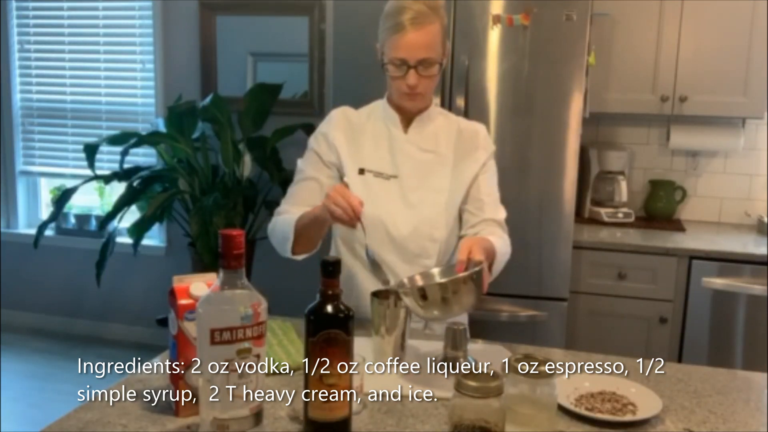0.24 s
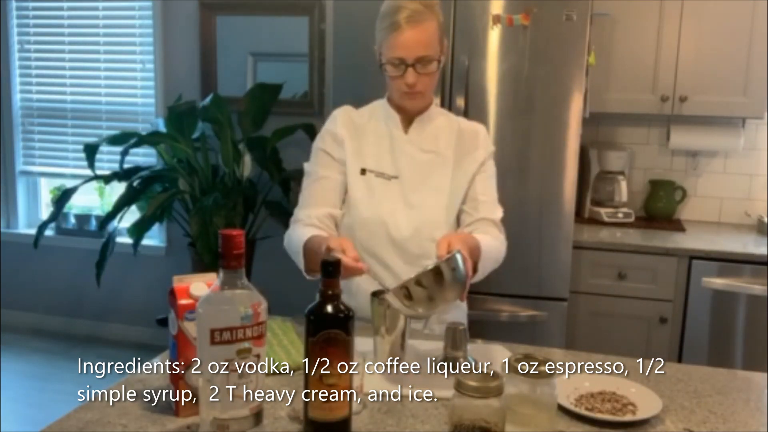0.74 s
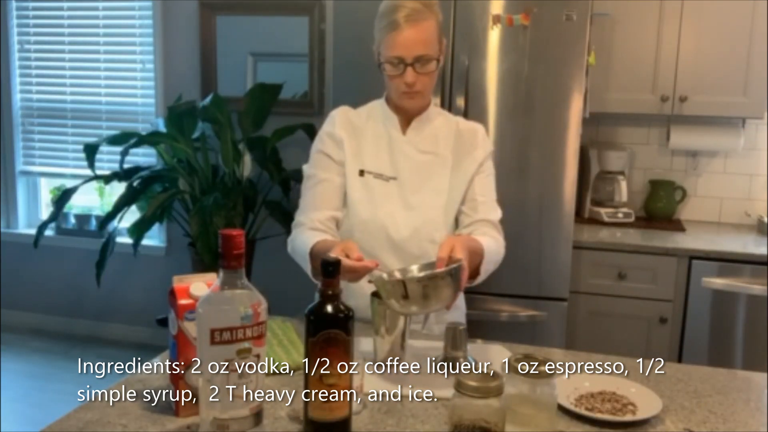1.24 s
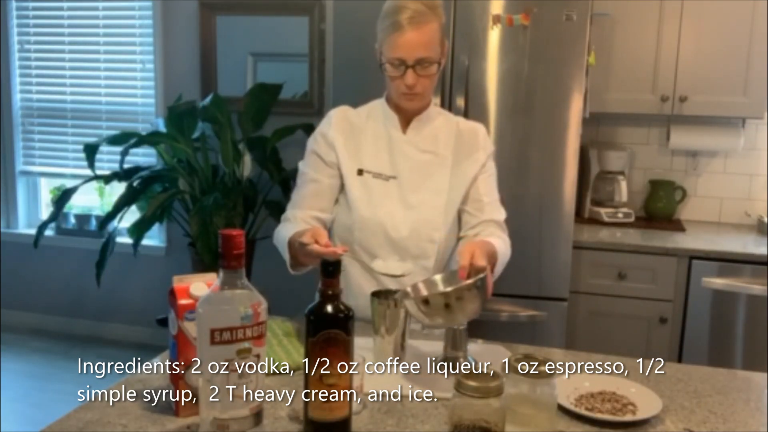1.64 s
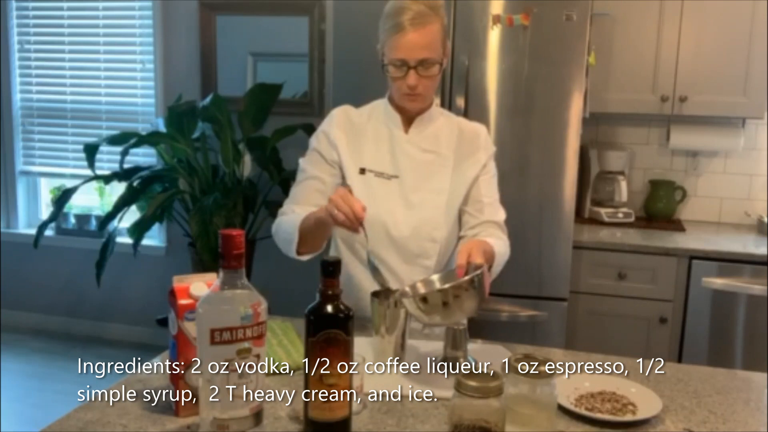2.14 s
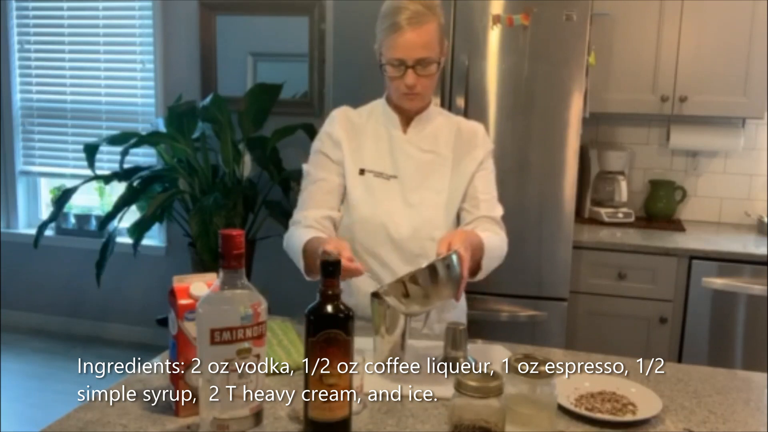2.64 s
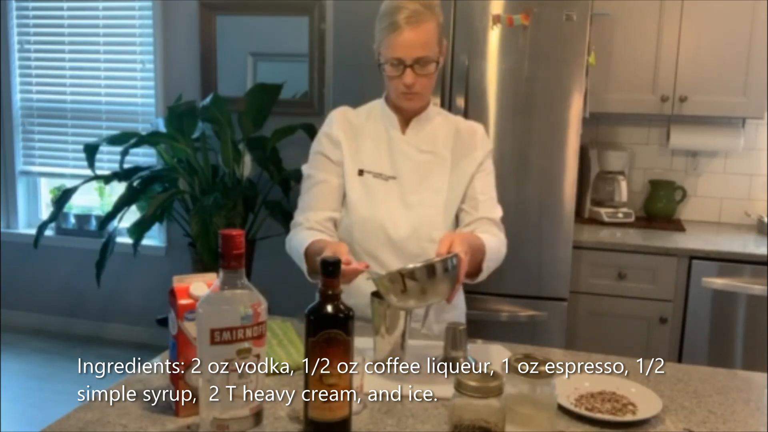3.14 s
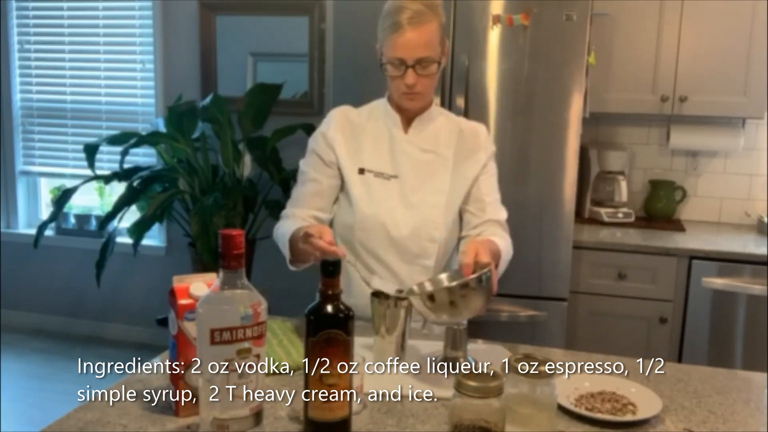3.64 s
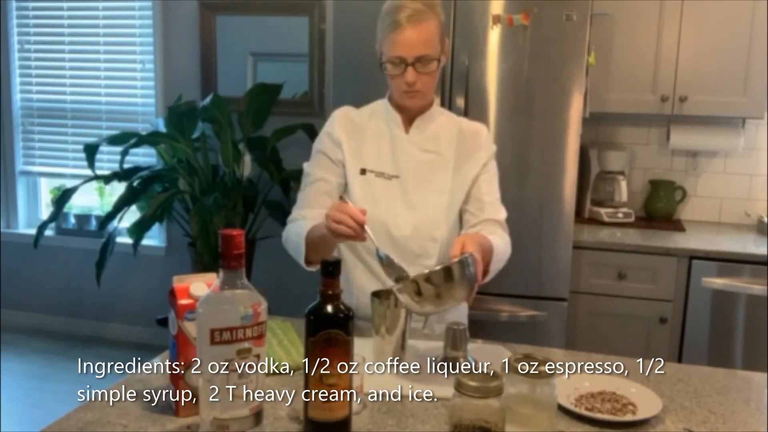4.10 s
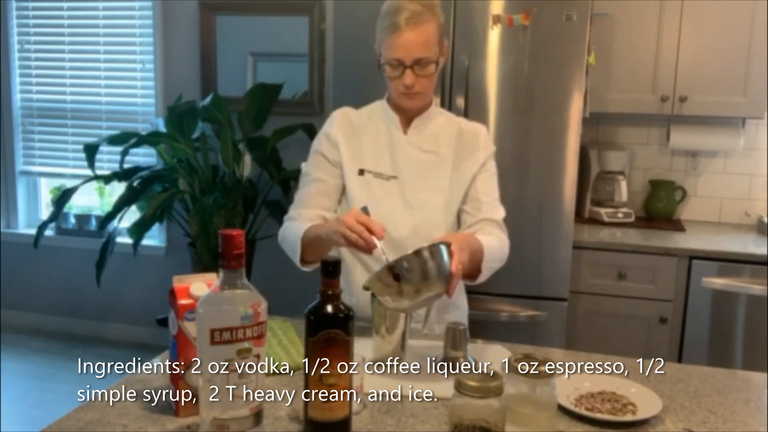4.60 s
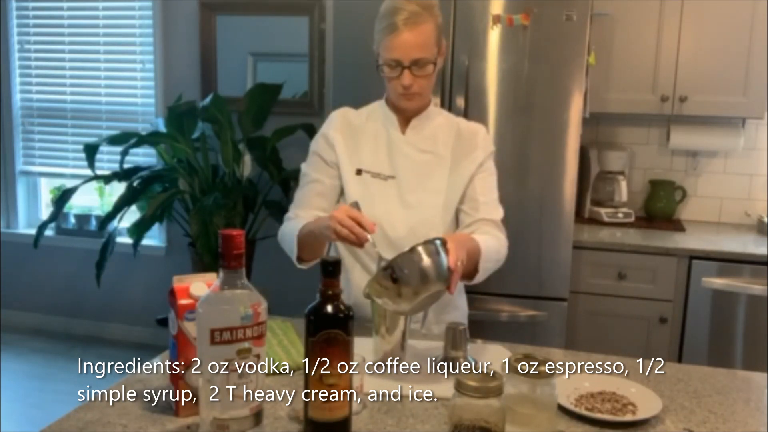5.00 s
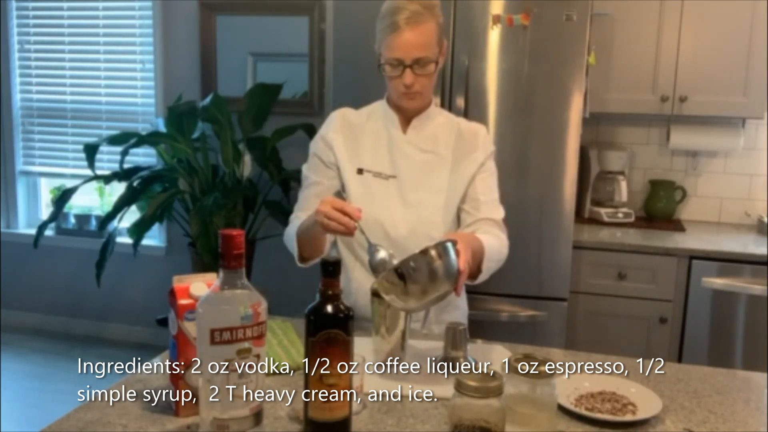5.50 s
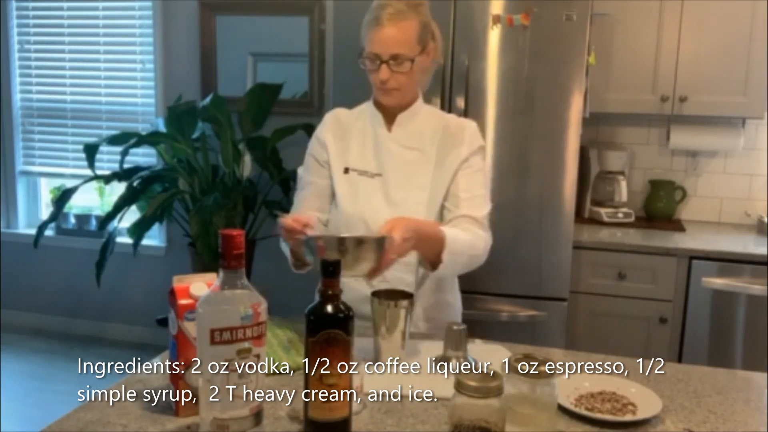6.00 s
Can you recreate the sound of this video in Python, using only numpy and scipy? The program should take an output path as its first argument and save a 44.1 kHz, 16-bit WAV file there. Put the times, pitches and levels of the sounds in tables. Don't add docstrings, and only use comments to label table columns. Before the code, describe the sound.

A refrigerator hums low and steadily in a bright, reflective kitchen, picked up in stereo from some metres away. At once a spoon raps a steel rim in rapid taps, with ice sliding and clinking until 0.2 s. A click at 0.5 leads into a dense rattling tumble of cubes in a steel bowl, strongest from 0.75 to 1.2, thinning by 1.45. Around 1.9 to 2.1 cubes drop into the metal tin with crisp, short rings. A sharp clink at 2.4 starts more scraping and clacking to 2.9. A hard snap at 3.0 begins a looser run of knocks until 3.3. After a lull, bright ticks come at 3.8 to 3.9, then a softer shuffle at 4.3 to 4.6. Sparse small clicks and faint scrapes continue from 5.0 to 5.6. At 6.0 to 6.2 the bowl is set down with hollow, ringing clanks and rattling ice.

```python
import sys
import numpy as np
from scipy import signal
from scipy.fft import rfft, irfft, next_fast_len
from scipy.io import wavfile
from scipy.ndimage import uniform_filter1d

SR = 44100
rng = np.random.default_rng(int(sys.argv[2]) if len(sys.argv) > 2 else 0)


def master_out(mix):
    frames = np.transpose(np.atleast_2d(mix))
    ceiling = np.clip(frames, -1, 1)
    pcm = np.round(ceiling * 32767).astype(np.int16)
    wavfile.write(sys.argv[1], SR, pcm)


def nominal_scale(level):
    x = np.asarray(level, float) / 20
    return 10 ** x


N = 275668

# pitch_hz, density_db_per_hz
DRONE = [(15, -55), (25, -23), (43, 2.5), (84, 2), (104, -0.5), (174, -4.5), (256, -1), (331, -11.5),
         (358, -23), (407, -4), (451, -30), (1060, -16), (1410, -32), (1520, -42), (12000, -55),
         (15600, -96), (22000, -120)]
# pitch_hz, width_hz, level_db
HUM = (115.8, 14.6, -58)
# pitch_hz, correlation
LIKENESS = [(100, 0.77), (500, 0.62), (1500, 0.11), (4000, 0.071), (6500, 0.087), (8500, 0.4), (12000, 0.7)]
# start_s, blow_db
RIM_HITS = [
    (.001, -33),
    (.048, -36),
    (.055, -33),
    (.062, -34),
    (.095, -42.5),
    (.165, -48),
]
# pitch_hz, level_db, t60_s
RIM_MODES = [(2770, -5.5, 0.075), (2800, -12, 0.1), (4440, -28, 0.068), (4350, -2, 0.09),
             (4450, -35, 0.083), (5663, -12, 0.056), (6464, -11.5, 0.1), (6656, -6.5, 0.061),
             (7480, -10.5, 0.078), (8600, -11.5, 0.069)]
# start_s, blow_db
TIN_HITS = [
    (1.913, -37.5),
    (1.963, -30),
    (1.972, -29),
    (1.99, -38),
    (2.012, -36.5),
    (2.07, -38),
    (2.085, -44),
]
# pitch_hz, level_db, t60_s
TIN_MODES = [(767, -9.5, 0.07), (2410, -23, 0.11), (2469, -4.5, 0.093), (2625, -17, 0.068),
             (4290, -11, 0.06), (4300, -14, 0.087), (6210, -8, 0.037)]
# start_s, blow_db
BOWL_HITS = [(.086, -35), (.1, -47), (.165, -52), (.195, -65), (3.251, -51), (3.291, -70), (4.384, -51),
             (4.461, -55), (6.04, -36.5), (6.058, -47), (6.09, -49), (6.134, -43.5), (6.164, -34),
             (6.178, -38), (6.2, -50)]
# pitch_hz, level_db, t60_s
BOWL_MODES = [(526, -20, 0.13), (616, -22, 0.23), (728.3, -4.5, 0.28), (809, -6, 0.25), (864, -8.5, 0.43),
              (909, -4.5, 0.28), (972, -10, 0.22), (1344, -6.5, 0.18), (1410, -17, 0.062),
              (1543, -7, 0.029), (1689, -10, 0.14), (1784, -10, 0.068), (2086, -7, 0.056),
              (2595, -6, 0.057), (3288, -6, 0.057), (4020, -15, 0.07), (7850, -29, 0.085)]
# start_s, level_db, pitch_hz, t60_s
RINGS = [(.001, -35, 4350, .2), (.03, -33, 4350, .12), (.056, -31, 4345, .08), (.05, -31, 2778, .12),
         (.1, -31, 2500, .04), (.105, -31, 1300, .04), (.194, -33, 760, .06), (1.962, -33, 4305, .12),
         (1.99, -33, 2450, .06), (2.02, -32, 2385, .07), (2.045, -38, 4240, .1), (2.401, -38, 3300, .12),
         (2.401, -38, 1250, .08), (3.014, -40, 2580, .08), (3.013, -37, 1170, .02),
         (3.038, -38, 1700, .012), (3.052, -46, 2550, .05), (3.03, -51, 3900, .15), (3.165, -44, 921, .15),
         (3.171, -44, 1670, .1), (3.215, -41, 550, .04), (3.237, -42, 1700, .012), (3.27, -39, 800, .04),
         (3.365, -40, 800, .06), (3.467, -46, 929, .03), (3.251, -37, 1650, .02), (3.253, -37, 915, .04),
         (3.29, -35, 1660, .025), (3.312, -35, 762, .03), (3.337, -38, 786, .08), (3.33, -41, 1660, .015),
         (3.443, -45, 875, .03), (3.8093, -40, 4510, .015), (3.858, -36, 2190, .06),
         (3.868, -35, 2440, .07), (3.868, -38, 3940, .03), (3.9245, -37, 2170, .04), (3.92, -38, 2750, .05),
         (3.925, -39, 3800, .04), (3.96, -41, 4000, .04), (6.025, -23, 910, .12), (6.037, -26, 900, .08),
         (6.057, -22, 880, .025), (6.056, -41, 4037, .05), (6.089, -34, 902, .2), (6.144, -32, 888, .03),
         (6.165, -32, 1360, .08), (6.222, -36, 3270, .06)]
# start_s, level_db, pitch_hz, t60_s
EARLY_CLACKS = [(.642, -36, 1730, .012), (.645, -36, 500, .03), (.757, -35, 738, .03),
                (.762, -43, 4300, .03), (.812, -31, 912, .02), (.83, -36, 1000, .015),
                (.845, -32, 1650, .02), (.899, -31, 1850, .015), (.928, -29, 1590, 0.016),
                (.955, -35, 1600, .04), (.987, -25.5, 1440, 0.014), (.995, -30, 1300, .012),
                (1.005, -34.5, 2800, .05), (1.034, -28, 1530, .03), (1.045, -31, 1560, .012),
                (1.034, -40, 3900, .05), (1.069, -30, 1400, .015), (1.075, -32, 2500, .02),
                (1.087, -29, 780, .02), (1.155, -31.5, 727, .025), (1.178, -33, 900, 0.044),
                (1.219, -37, 716, 0.034), (1.251, -38, 896, .03), (1.913, -40, 2465, 0.11),
                (1.965, -31, 2465, 0.13), (2.012, -33, 4235, .1), (2.075, -38, 2400, .1),
                (2.078, -36, 2750, .05), (2.225, -37, 975, 0.11), (2.415, -37.5, 2600, 0.092),
                (2.445, -38, 2600, .08), (2.475, -34, 1800, 0.009), (2.487, -34, 915, 0.036),
                (2.527, -34, 907, 0.071), (2.567, -37, 3450, .07), (2.585, -38, 2600, .03),
                (2.608, -33, 756, 0.027), (2.67, -40, 1750, .04), (2.675, -36, 856, .03),
                (2.705, -37, 700, .02), (2.728, -37.5, 918, 0.037), (2.818, -37, 1800, 0.016)]
# start_s, level_db, pitch_hz, t60_s
LATE_CLACKS = [(2.49, -38, 420, .05), (2.53, -39, 500, .05), (2.58, -40, 350, .06), (6.15, -36, 250, .12),
               (6.2, -39, 260, .1), (.66, -42, 330, .08), (.76, -41, 300, .08), (4.292, -36, 697, 0.034),
               (4.302, -48, 1840, 0.044), (4.362, -41, 1700, .012), (4.39, -36, 818, .02),
               (4.411, -35.5, 915, .025), (4.411, -39, 1690, .02), (4.422, -39, 1650, .015),
               (4.462, -33, 746, .03), (4.484, -38, 760, .03), (4.497, -38, 800, .015),
               (4.48, -43, 3400, .03), (4.531, -39, 764, .03), (4.531, -42, 3200, .02),
               (4.553, -40, 3400, .015), (4.555, -41, 4000, .015), (4.588, -41, 1700, .03),
               (4.596, -43, 3450, .04), (4.625, -48, 2000, .012), (4.659, -41, 805, .03),
               (4.685, -43, 802, 0.032), (5.051, -41, 1100, .02), (5.0754, -41, 1100, .04),
               (5.1248, -45, 1520, .05), (5.125, -39, 8000, 0.011), (5.186, -39, 7800, .006),
               (5.1862, -40, 3000, .004), (5.2241, -40, 796, .04), (5.259, -42, 2840, .02),
               (5.297, -43, 2800, .015), (5.4077, -45, 7000, .004), (5.416, -45, 8000, .004),
               (5.4, -49, 800, .08), (5.471, -47, 2580, 0.088), (5.538, -46, 2530, .04),
               (5.5585, -39, 2080, 0.035), (5.6355, -42, 4310, .015), (5.7534, -51, 2110, .03)]
# peak_s, swell_s, ebb_s, level_db, brightness_db_per_band_step
PUSHES = [(2.82, 0.17, .15, -54, 0), (3.68, 0.17, 0.14, -58.5, -6.5), (4.6, .15, .2, -53, 3),
          (.06, 0.49, 0.048, -34, 4.5), (.29, 0.067, 0.2, -49.5, -5), (.7, 0.17, .3, -37.5, 2),
          (1.0, 0.62, 0.32, -34.5, 1.5), (1.12, 0.26, 0.28, -42, -5), (1.52, 0.25, 0.17, -54, 0.5),
          (1.98, 0.09, 0.19, -39, -3.5), (2.11, 0.047, 0.068, -39, 0.5), (2.6, 0.2, 0.48, -34, 0.5),
          (3.28, 0.23, 0.31, -45, -8), (3.88, 0.2, 0.21, -49, 0.5), (4.47, 0.21, 0.32, -39.5, -4),
          (4.98, 0.4, 0.37, -49, 3.5), (5.22, .2, 0.19, -50, -4), (5.52, 0.61, 0.14, -49, 1.5),
          (5.9, 0.21, 0.28, -60.5, -9.5), (6.2, 0.21, 0.083, -33.5, 2)]
# start_s, crack_db, thud_db, tick_db
LARGE = [(1.037, -23, -37, -59), (6.03, -32, -30, -55), (3.0115, -28.5, -35, -41), (0.084, -30, -33, -67),
         (6.155, -45, -30.5, -44), (0.13, -39, -46, -63), (.9858, -22.5, -33, -44.5),
         (1.41, -29.5, -42, -35.5), (1.4506, -36, -44, -41.5), (2.2254, -39, -54, -64),
         (3.809, -26, -41, -47), (5.0503, -28, -41, -47), (6.0209, -45, -32.5, -44.5),
         (6.165, -18.5, -33.5, -28.5)]
# start_s, crack_db, thud_db, tick_db
MIDDLING = [(0.8085, -27.5, -34, -56), (.93, -32, -39, -55), (0.757, -26, -36, -60),
            (.845, -22.5, -42, -49), (0.899, -21, -34, -41), (1.08, -25.5, -37, -50),
            (1.1549, -34.5, -33, -42.5), (2.4749, -25, -29, -33.5), (2.818, -36, -41.5, -57),
            (2.8953, -28.5, -41.5, -48), (3.677, -62, -50.5, -68), (3.0387, -42, -55, -60),
            (3.1708, -35, -43, -52), (3.1975, -31.5, -40.5, -45), (3.2203, -33, -45, -35),
            (3.252, -30, -36, -54), (3.2915, -28, -39, -33.5), (3.5962, -48, -49, -74),
            (3.747, -54, -46, -68), (4.362, -34, -43, -49), (4.3853, -48, -35.5, -49),
            (4.4092, -35, -35.5, -45.5), (4.4708, -32, -45, -41.5), (4.5884, -35, -40, -43.5),
            (4.9473, -51, -57, -44), (5.125, -36, -45, -46), (5.854, -43, -51, -60), (6.057, -36, -45, -38),
            (6.136, -41, -55, -39)]
# start_s, crack_db, thud_db, tick_db
SMALL = [(.094, -16, -32, -45), (0.1019, -17, -40, -36), (.113, -27, -33, -55), (4.849, -57, -51.5, -60),
         (0.517, -17, -34.5, -36.5), (.609, -23.5, -36.5, -41.5), (1.912, -22.5, -49, -55),
         (1.963, -26, -38.5, -42), (1.9707, -18, -42, -40), (2.0138, -16, -50, -40.5),
         (2.0749, -22, -40, -52), (2.277, -39.5, -62, -74), (3.8302, -16, -40, -35),
         (3.869, -17.5, -39, -53), (3.895, -29, -45, -59), (4.2908, -35, -34, -41),
         (4.9784, -33.5, -50, -54), (5.079, -29, -41.5, -49), (5.1854, -33, -48, -46.5),
         (5.3662, -39.5, -65, -67), (5.408, -34, -48.5, -52), (5.4894, -44, -50, -52),
         (5.5567, -28.5, -43, -53), (6.041, -22, -31.5, -40), (6.088, -42, -57, -43)]
# start_s, crack_db, thud_db, tick_db
CHIPS = [
    (5.2379, -23.5, -39.5, -57),
    (0.1654, -27, -32, -62),
    (2.3991, -16.5, -33, -31.5),
    (2.5644, -22, -36.5, -40.5),
    (4.5522, -29, -56, -55),
    (5.6346, -28.5, -55, -76),
    (6.2002, -29, -54, -45),
]
# clack_hz, clack_db, t60_s, rise_share
SIZES = [
    (1370, 1, 0.029, 0.044),
    (1650, 0, 0.037, 0.079),
    (2490, -4, .032, 0.03),
    (3940, -14.5, 0.033, 0.027),
]
# start_s, level_db,
# pitch_hz, t60_s
POPS = [(2.145, -36.5, 972, 0.087), (2.225, -34, 975, 0.069), (2.24, -36.5, 1100, 0.031),
        (2.276, -42, 2130, 0.03), (2.402, -25, 522, 0.025), (3.015, -28, 1710, 0.0085),
        (2.4, -25, 7980, 0.028), (2.6, -44, 2600, 0.1), (3.172, -44, 2000, 0.046),
        (5.856, -49.5, 880, 0.37), (6.041, -31, 2570, 0.064), (5.856, -54, 730, 0.15),
        (1.414, -40, 11000, .012), (0.609, -35, 6380, 0.035), (5.4, -53, 810, 0.47), (5.24, -47, 920, 0.16),
        (2.8, -48, 8100, 0.045), (2, -38, 2540, 0.057), (3.83, -40, 2160, 0.076), (3.829, -37, 2550, 0.054),
        (3.832, -38, 3960, 0.03), (5.187, -48, 2095, 0.2), (.165, -32, 780, 0.037),
        (5.238, -41, 2800, 0.041), (6.024, -25, 900, 0.1), (6.056, -27, 904, 0.044),
        (6.088, -33, 907, 0.13), (6.165, -35, 2424, 0.074), (6.172, -35.5, 4037, 0.093),
        (2.012, -30, 2385, .07)]
# start_s, level_db
SNAPS = [
    (0.516, -39.5),
    (0.987, -35),
    (1.971, -28),
    (2.226, -27),
    (2.406, -32),
    (3.012, -19),
    (5.186, -27),
    (5.238, -31),
    (5.635, -37),
]
# pitch_hz, t60_s, level_db
ECHO = [(250, 0.27, 6.5), (580, 0.66, -3.5), (1440, 0.74, -0.5), (3300, 0.68, 3), (5960, 0.78, -2),
        (9300, 0.41, 4), (15100, 0.51, -8)]
# pitch_hz, left_lead_rad, left_over_right_db
PORTS = [(0, 0, 3.5), (744, 0.59, 0), (1300, 0.5, -0.5), (3080, -1.63, 0.5), (4430, -1.38, 1.5),
         (5370, -np.pi, 2), (8000, 0.5, 1), (16400, 15, 2)]
# pitch_hz, floor_db, under_pair_sum_db
SILENT_UNDER = [(4970, -120, -16), (7580, -115, -8), (9430, -104, -3), (11100, -108, -7), (12800, -99, -3),
                (14900, -99, -5), (15900, -93.5, -2)]

PUSH_FADE_DB = 22.5
CLACK_NEAR_SHARE = 0.6


def unit_power(x):
    return x / np.sqrt(np.mean(x ** 2) + 1e-20)


def at_hz(points, hz, axis=1):
    points = np.array(points)
    return np.interp(np.log(hz), np.log(points[:, 0]), points[:, axis])


def band(x, low_hz, high_hz):
    return signal.sosfilt(signal.butter(2, [low_hz, high_hz], "band", fs=SR, output="sos"), x)


def diffuse(size, gain_of_band):
    out = 0
    edges_hz = 22 * 2 ** np.arange(0, 9.6, .5)
    white = rng.standard_normal((2, 2, size))
    for k, (low_hz, high_hz) in enumerate(zip(edges_hz, edges_hz[1:])):
        mid, side = band(white[k % 2], low_hz, high_hz)
        hz = np.sqrt(low_hz * high_hz)
        alike = np.clip(at_hz(LIKENESS, hz), -1, 1)
        stereo = np.sqrt(1 + alike) * mid + np.sqrt(1 - alike) * side * [[1], [-1]]
        out = out + gain_of_band(hz) * stereo
    return out


def drone(rumble_db=-54):
    hz, width_hz, hum_db = HUM
    hum = unit_power(band(rng.standard_normal(N), hz - width_hz / 2, hz + width_hz / 2))
    rumble = unit_power(diffuse(N, lambda hz: nominal_scale(at_hz(DRONE, hz))))
    return nominal_scale(rumble_db) * rumble + nominal_scale(hum_db) * hum


def ring(clicks, hz, t60_s):
    r = nominal_scale(-60 / (t60_s * SR))
    w = 2 * np.pi * hz / SR
    return signal.lfilter([0, np.sin(w)], [1, -2 * r * np.cos(w), r * r], clicks + 1e-18)


def struck(hits, modes, spread_db, waver_share=0.82):
    start_s, blow_db = np.transpose(hits)
    luck = rng.standard_normal((len(start_s), len(modes)))
    out = np.zeros(N)
    for k, (hz, level_db, t60_s) in enumerate(modes):
        clicks = np.zeros(N)
        clicks[(start_s * SR).astype(int)] = nominal_scale(blow_db + level_db + spread_db * luck[:, k])
        knots = N // 441 + 2
        waver = np.interp(np.arange(N) / 441, np.arange(knots), rng.standard_normal(knots))
        out += ring(clicks, hz, t60_s) * (1 + waver_share * waver)
    return out


def clacks():
    out = np.zeros(N + 8000)
    t = np.arange(8000) / SR
    for start_s, level_db, hz, t60_s in EARLY_CLACKS + LATE_CLACKS + RINGS:
        at = int(start_s * SR)
        out[at:at + 8000] += nominal_scale(level_db - 60 * t / t60_s) * np.sin(2 * np.pi * hz * t)
    return out[:N]


def pushes(step):
    t = np.arange(0, N + 64, 64) / SR
    power = 0
    for peak_s, swell_s, ebb_s, level_db, bright_db in PUSHES:
        away = np.maximum((peak_s - t) / swell_s, (t - peak_s) / ebb_s)
        power = power + nominal_scale(level_db + step * bright_db - PUSH_FADE_DB * away) ** 2
    return np.interp(np.arange(N) / SR, t, np.sqrt(power))


def slither(per_s=600, uneven_db=5.5, cycles=14.0):
    boom, scrape, grit, fizz = (pushes(step) for step in range(-1, 3))
    sizes = nominal_scale(uneven_db * np.minimum(rng.exponential(1, N), 2.6)) * rng.choice([-1, 1], N)
    grains = sizes * (rng.random(N) < per_s / SR)
    dealt = rng.integers(0, len(BOWL_MODES), N)
    shell, cubes = np.zeros((2, N))
    cube_hz = np.geomspace(550, 4200, len(BOWL_MODES))
    for k, (hz, level_db, t60_s) in enumerate(BOWL_MODES):
        own = grains * (dealt == k)
        shell += nominal_scale(level_db) * ring(own, hz, 0.22 * t60_s)
        cubes += ring(own, cube_hz[k], cycles / cube_hz[k])
    mix = unit_power(shell) + 0.5 * unit_power(cubes) + 0.5 * unit_power(band(grains, 630, 4500))
    out = nominal_scale(-7.0) * boom * unit_power(band(mix, 410, 1265))
    out += nominal_scale(-8.5) * scrape * unit_power(band(mix, 1310, 3580))
    out += nominal_scale(-14.5) * grit * unit_power(band(mix, 3000, 7400))
    return out + nominal_scale(-19.5) * fizz * unit_power(band(grains, 8440, 14000))


def knocks(pitch_spread=0.064):
    t = np.arange(3000) / SR
    crack, thud, tick, clack = np.zeros((4, N + 3000))
    for rows, (size_hz, clack_db, t60_s, rise) in zip((LARGE, MIDDLING, SMALL, CHIPS), SIZES):
        fall = nominal_scale(-60 * t / t60_s) * (1 - np.exp(-t / (rise * t60_s)))
        for start_s, crack_db, thud_db, tick_db in rows:
            burst = rng.standard_normal((3, 3000))
            at = slice(int(start_s * SR), int(start_s * SR) + 3000)
            hz = size_hz * (1 + pitch_spread * rng.standard_normal())
            body = band(burst[0] * fall ** 0.82, 0.942 * hz, 1.142 * hz)
            crack[at] += nominal_scale(crack_db - 4.5) * burst[0] * fall
            clack[at] += nominal_scale(crack_db + clack_db) * body
            thud[at] += nominal_scale(thud_db + 12.5) * burst[1] * fall ** 0.58
            tick[at] += nominal_scale(tick_db + 11) * burst[2] * fall
    out = band(crack, 1330, 6660) + clack + band(thud, 382, 1297) + band(tick, 8010, 14200)
    return out[:N]


def pops():
    out = np.zeros(N)
    for start_s, level_db, hz, t60_s in POPS:
        out += struck([(start_s, level_db)], [(hz, 0, t60_s)], 0, waver_share=0.17)
    return out


def snaps():
    start_s, level_db = np.transpose(SNAPS)
    clicks = np.zeros(N)
    clicks[(start_s * SR).astype(int)] = nominal_scale(level_db + 16.0)
    return band(clicks + 1e-18, 670, 2150)


def kitchen(x):
    t = np.arange(SR) / SR
    echo = diffuse(SR, lambda hz: nominal_scale(at_hz(ECHO, hz, axis=2) - 60 * t / at_hz(ECHO, hz)))
    echo *= nominal_scale(-32) * np.clip((t - .002) / 0.0014, 0, 1)
    return x + signal.fftconvolve(x[None], echo, axes=1)[:, :N]


def scene():
    steel = struck(RIM_HITS, RIM_MODES, 0.55, waver_share=0.68)
    steel += struck(TIN_HITS, TIN_MODES, 2.0, waver_share=0.36)
    steel += struck(BOWL_HITS, BOWL_MODES, 3.9) + pops()
    snap, clack = snaps(), clacks()
    counter = band(steel, 340, 18000) + knocks() + slither()
    counter += 0.36 * snap + (1 - CLACK_NEAR_SHARE) * clack
    near = 0.57 * snap + CLACK_NEAR_SHARE * clack
    return kitchen(counter) + near + drone()


def ports(x):
    size = next_fast_len(N + 1024)
    hz, lead_rad, left_db = np.transpose(PORTS)
    grid_hz = np.fft.rfftfreq(size, 1 / SR)
    half = nominal_scale(np.interp(grid_hz, hz, left_db) / 2) * np.exp(.5j * np.interp(grid_hz, hz, lead_rad))
    return irfft(rfft(x, size) * np.stack([half, 1 / half]), size)[:, :N]


def thin_treble(x, follow=0.54, chance_db=3.5):
    hz, _, z = signal.stft([[.5, 0.46], [.5, -0.53]] @ x, SR, nperseg=1536)
    power = np.abs(z) ** 2 + 1e-20
    loud_db = 10 * np.log10(power.sum(axis=(0, 1))) + 45
    edges = np.searchsorted(hz, np.arange(5000, 16500, 300))
    for low, high in zip(edges, edges[1:]):
        each = uniform_filter1d(power[:, low:high].mean(axis=1), size=7)
        chance = uniform_filter1d(rng.standard_normal(each.shape), size=4)
        level_db = 10 * np.log10(each) + chance_db * chance
        pair_db = 10 * np.log10(each.sum(axis=0))
        audible = level_db > at_hz(SILENT_UNDER, hz[low]) + follow * loud_db
        rivals = level_db > pair_db + at_hz(SILENT_UNDER, hz[low], axis=2)
        z[:, low:high] *= (audible & rivals)[:, None]
    return [[1, 0.9], [1, -0.93]] @ signal.istft(z, SR, nperseg=1536)[1][:, :N]


def band_limit(x):
    return signal.sosfilt(signal.butter(12, 16660, fs=SR, output="sos"), x)


def record(dry):
    top_cut = signal.cheby2(12, 60, 16300, fs=SR, output="sos")
    mix = thin_treble(signal.sosfilt(top_cut, ports(dry)))
    return band_limit(mix)


dry = scene()
out = record(dry)
master_out(out)
```